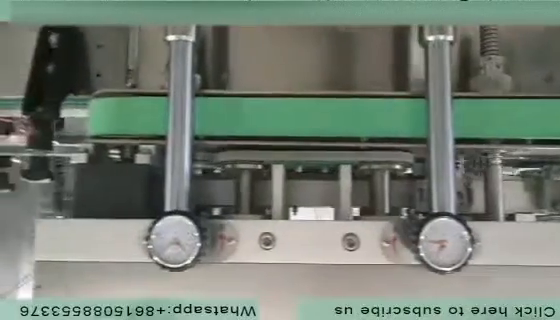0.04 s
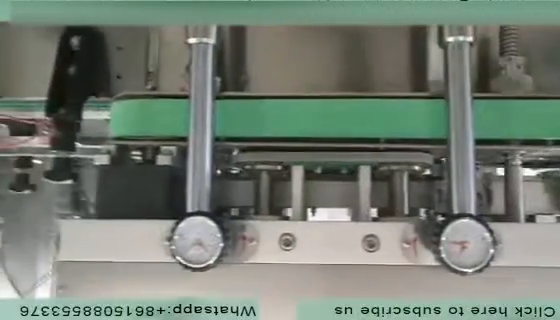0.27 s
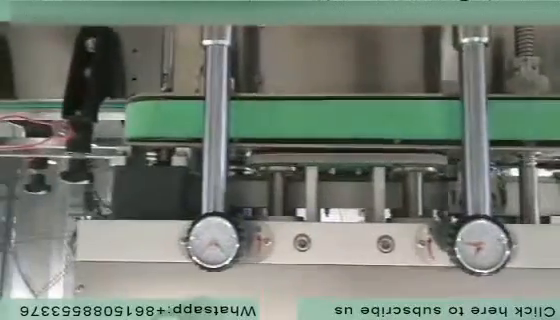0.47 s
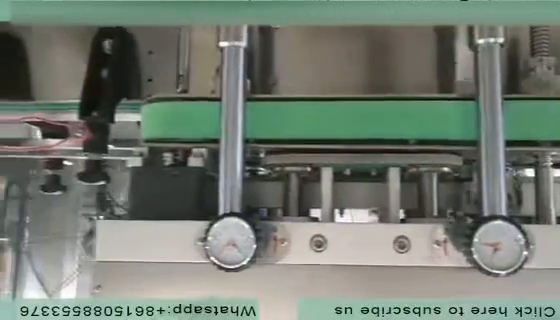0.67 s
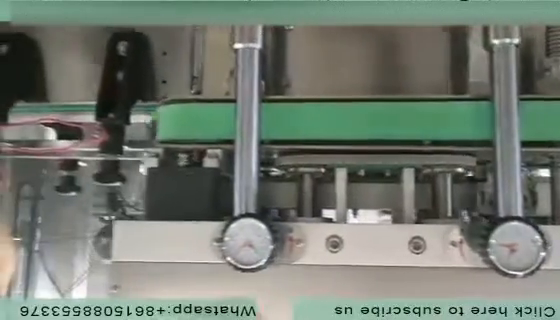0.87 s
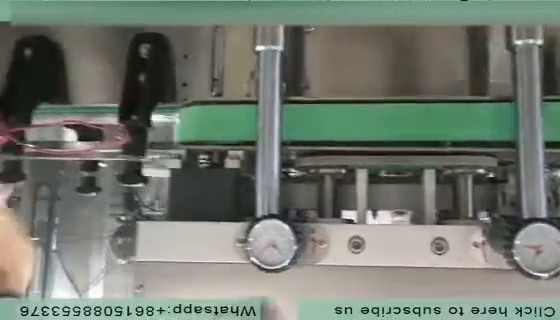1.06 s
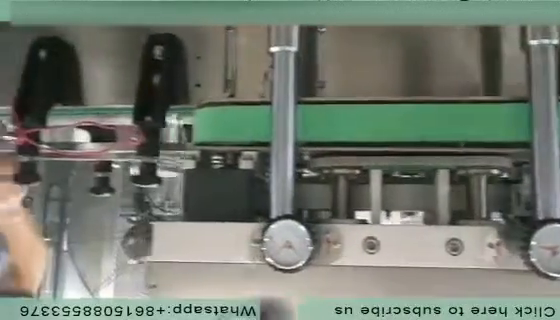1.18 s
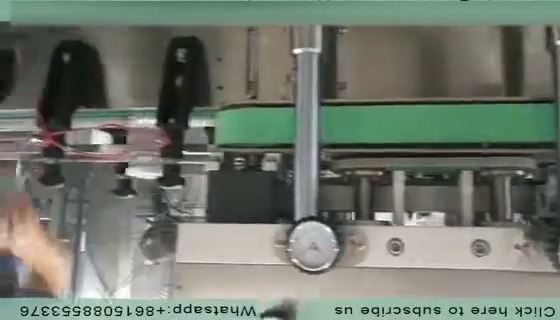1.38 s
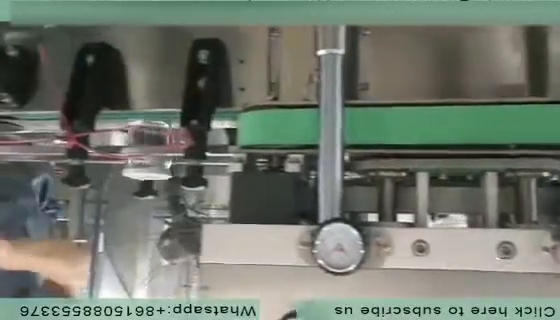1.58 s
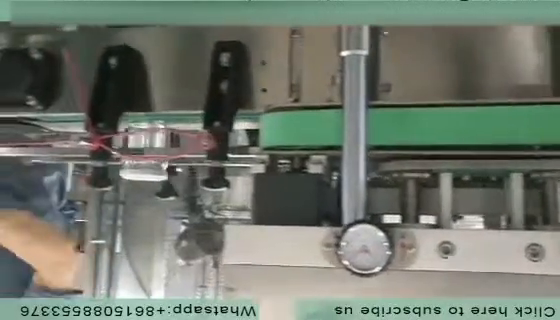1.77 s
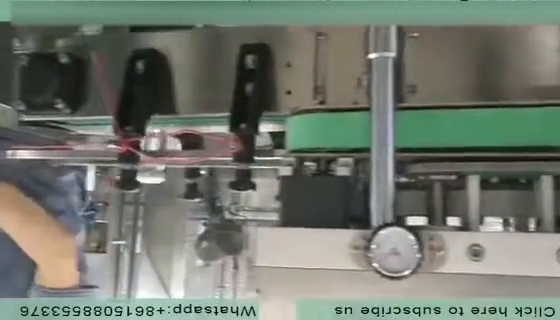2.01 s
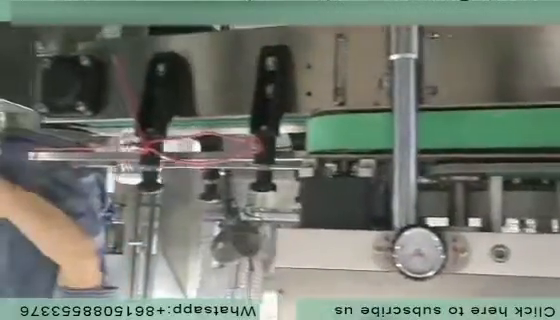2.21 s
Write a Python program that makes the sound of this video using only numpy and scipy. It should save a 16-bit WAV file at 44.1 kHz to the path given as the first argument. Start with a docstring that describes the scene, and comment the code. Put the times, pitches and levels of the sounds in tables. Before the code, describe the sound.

Hard parts clack close by on a bottling line, at about 0.2 and 0.4 seconds, ringing briefly in a factory hall. Small taps follow. Light steel pieces jangle from 1 second, and a heavier fitting clatters brightly at 1.3. Soft thuds boom in the casing around 1.5, then a hollow knock comes at 1.9 with more bumps. A low motor hum and steady air lie underneath.

```python
"""Hard parts clack twice on the guide of a bottle capping line, close to a stereo pair in a factory hall.
A steel fitting clatters, lighter ones jangle, a hollow part knocks: each burst is a run of quick contacts
that ring one body and carry into the hall. Loose parts tap, and soft bumps boom in the casing.
Behind the machine lie a low motor hum and the steady air of the hall."""
import sys
import numpy as np
from scipy import signal
from scipy.fft import rfft, irfft, next_fast_len
from scipy.io import wavfile
from scipy.ndimage import map_coordinates

SR = 44100
rng = np.random.default_rng(int(sys.argv[2]) if len(sys.argv) > 2 else 0)


def to_wav(s):
    """Save 16-bit WAV."""
    ch = np.atleast_2d(s).T  # columns
    pcm = np.round(np.clip(ch, -1, 1) * 32767)  # PCM
    wavfile.write(sys.argv[1], SR, pcm.astype(np.int16))


N = 99225
TIME = np.arange(N) / SR


# Contacts on the guide. Each row: start in seconds, relative level in dB.
CLACK_CONTACTS = [(.2412, -1), (.2454, 2.5), (.2497, -1.5), (.2563, -0.5), (.2638, 1.5), (.2702, -1),
                  (.2775, -6.5), (.2843, -8), (.2966, -8.5), (.3047, -10), (.3124, -10), (.3178, -9.5),
                  (.3826, -10), (.3868, -1.5), (.3943, -6.5), (.4005, -9.5), (.4059, -12), (.4112, -13),
                  (.4177, -4), (.4254, -8), (.4318, -15.5)]
# The slide into each clack. Each row: start and end in seconds, relative final level in dB.
CLACK_SLIDES = [(0.174, 0.246, -35.5), (0.379, 0.4, -25.5)]
# The hard part's ring. Each row: frequency in Hz, relative level in dB, t60 in seconds.
CLACK_RING = [(928, -3, 0.13), (1352, 3, 0.27), (1528, -2, .3), (1563, 0.5, 0.48), (1704, 7.5, 0.12),
              (1905, -7, 0.24), (1976, -0.5, 0.43), (2270, 0, .35), (3155, -5, 0.25), (3654, -5, 0.13)]
# Its tone from close by. Each row: frequency in Hz, gain in dB.
CLACK_TONE = [(100, -30.5), (400, -27), (720, -15), (900, -7.5), (1300, -5), (1600, 2), (2000, 0),
              (2600, -7.5), (4000, -8), (6400, -12.5), (7500, -20), (14000, -27.5)]
# Its place between the microphones. Each row: frequency in Hz, left minus right in dB.
CLACK_BALANCE = [(500, 2), (1100, -5), (1700, -9), (3000, 4), (5500, 4), (10000, 9)]

def clacks():
    """Close to the microphones, a hard part slides up, lands twice and chatters to rest."""
    rub, rise_db = 0, 7.5
    for start, end, db in CLACK_SLIDES:
        remaining = np.clip((end - TIME) / (end - start), 0, 1)
        rub += amp(db - rise_db * remaining) * (TIME > start) * (TIME < end)
    hits = struck(CLACK_CONTACTS, CLACK_RING, crack_db=0.5, dense_db=1, dense_t60=0.13,
                  modes_db=-13, hall_db=0)
    return placed(amp(12) * hits + amp(9) * rub * diffuse(), CLACK_TONE, CLACK_BALANCE, lead_ms=0.24)


# Contacts of the heavy fitting. Each row: start in seconds, relative level in dB.
FITTING_CONTACTS = [(.707, -22.5), (1.309, -2), (1.314, -0.5), (1.318, 6), (1.325, -1), (1.328, 4.5),
                    (1.333, -0.5), (1.338, -26), (1.345, -1.5), (1.366, -2.5)]
# Its ring. Each row: frequency in Hz, relative level in dB, t60 in seconds.
FITTING_RING = [(735, 6.5, 0.12), (777, -9, 0.35), (1050, 1, 0.17), (1459, 7.5, 0.29), (2277, 7.5, 0.31),
                (3280, -11, 0.18), (3150, -1, 0.18), (3300, -7, 0.26), (3750, -3, 0.19), (3992, -1, 0.41),
                (4890, -7, 0.37), (6204, -12, 0.5)]
# Its tone. Each row: frequency in Hz, gain in dB.
FITTING_TONE = [(100, -33), (400, -22.5), (600, -7), (750, -2.5), (1200, -4), (1600, -2.5), (2400, -3.5),
                (3500, -1), (4800, -5), (6400, -8), (7300, -17), (10000, -19.5), (14000, -26.5)]
# Where the steel sits, heavy and light alike. Each row: frequency in Hz, left minus right in dB.
STEEL_BALANCE = [(600, -0.5), (1100, -7.5), (1800, 1), (3000, -1.5), (5500, 6.5), (10000, 6.5), (13500, 18)]

def fitting_clatter():
    """A heavy steel fitting drops in a bright clatter that reaches the left microphone first."""
    hits = struck(FITTING_CONTACTS, FITTING_RING, crack_db=-13, dense_db=2.5, dense_t60=0.13,
                  modes_db=-10.5, hall_db=-0.5)
    return amp(6.5) * placed(hits, FITTING_TONE, STEEL_BALANCE, lead_ms=0.281)


# Contacts of the light steel parts. Each row: start in seconds, relative level in dB.
JANGLE_CONTACTS = [(.157, -11), (.165, -14), (.178, -25), (.998, -4.5), (1.006, -9.5), (1.022, -6),
                   (1.036, 1.5), (1.046, -1), (1.062, -10), (1.087, -1), (1.096, -8), (1.108, -5),
                   (1.205, -8), (1.24, -19), (1.275, -18), (1.447, -1), (1.497, -11)]
# Their ring. Each row: frequency in Hz, relative level in dB, t60 in seconds.
JANGLE_RING = [(2020, -6, 0.098), (2304, 1, .25), (2744, 2.5, 0.16), (2926, -1, .25), (3100, -4.5, .2),
               (3470, 0, 0.23), (3520, 0, 0.11), (3990, 2.5, 0.14), (5600, 8, .13), (6210, 6, 0.2)]
# Their tone. Each row: frequency in Hz, gain in dB.
JANGLE_TONE = [(100, -30), (600, 0), (1200, -12.5), (1700, 4), (2300, 4), (3100, 5.5), (4000, 0.5),
               (4800, 1), (6300, -2), (7300, -8), (9500, -9.5), (14000, -24)]

def jangle():
    """Beside the heavy fitting, light steel parts brush each other and ring."""
    hits = struck(JANGLE_CONTACTS, JANGLE_RING, crack_db=-12, dense_db=5.5, dense_t60=0.35,
                  modes_db=-3.5, hall_db=-4)
    return amp(-6) * placed(hits, JANGLE_TONE, STEEL_BALANCE, lead_ms=0.262)


# Contacts of the hollow part. Each row: start in seconds, relative level in dB.
KNOCK_CONTACTS = [(.003, -9.5), (.835, -8), (.86, -7.5), (1.881, -7.5), (1.887, -0.5), (1.892, -6),
                  (1.897, 7), (1.906, -5), (1.919, -3), (1.929, 2), (1.969, -11)]
# A small panel, here and in the casing. Each row: frequency in Hz, relative level in dB, t60 in seconds.
SMALL_PANEL_RING = [(465.5, -1.5, 0.18), (484.6, -5, 0.12), (527, -8.5, 0.045)]
# The hollow part's tone. Each row: frequency in Hz, gain in dB.
KNOCK_TONE = [(100, -11), (350, -7), (480, 1.5), (640, 0), (850, -5.5), (1300, -4.5), (1700, -3),
              (2400, -4), (3300, -8), (4300, -14), (6500, -15), (9000, -24), (14000, -33)]
# Its place. Each row: frequency in Hz, left minus right in dB.
KNOCK_BALANCE = [(600, -7), (1700, 2.5), (3000, -21), (5500, 5), (10000, 6.5), (13500, 11)]

def knocks():
    """A hollow part is knocked, a little to the right of the microphones."""
    hits = struck(KNOCK_CONTACTS, SMALL_PANEL_RING, crack_db=-3, dense_db=6.5, dense_t60=0.25,
                  modes_db=-22, hall_db=-4)
    return amp(-3) * placed(hits, KNOCK_TONE, KNOCK_BALANCE, lead_ms=-0.26)


# Bumps on the casing. Each row: start in seconds, relative levels of deep and small panel in dB.
CASING_BUMPS = [(.002, -27, -6), (0.044, -19, -7.5), (0.589, -11, -29), (0.789, -3.5, -21),
                (0.829, -5.5, -18), (0.859, -27, -4.5), (1.44, 0, -11.5), (1.45, 3, -14.5), (1.496, 4, -13),
                (1.512, -1.5, -42), (1.568, -5, -16), (1.893, -5, -0.5), (1.917, -18, 7.5),
                (1.931, 6, -9.5), (1.967, -16, 2), (2.005, -12, -2.5), (2.018, 2.5, -11), (2.046, 0, -3),
                (2.085, -26, -17), (2.157, -18, -12), (2.202, -5, -16)]
# Jolts of the frame. Each row: start in seconds, relative level in dB.
FRAME_JOLTS = [(.715, -41.5), (1.38, -40), (1.92, -35), (2.015, -33), (2.11, -40), (2.165, -50)]
# The deep panel and the frame ringing. Each row: frequency in Hz, relative level in dB, t60 in seconds.
DEEP_PANEL_RING = [(182.3, -9, 0.19), (200.5, 2.5, 0.14), (255, -5, .1)]
FRAME_RING = [(96, 0, 0.1), (140.6, 2, 0.227)]

def casing_thuds():
    """Just right of centre, bumps boom in two panels and jolts shake the frame, with little deep bass."""
    bumps = np.array(CASING_BUMPS)
    deep = excite(blows(bumps[:, [0, 1]]), ringing(DEEP_PANEL_RING) * attack(0.0098))
    small = excite(blows(bumps[:, [0, 2]]), ringing(SMALL_PANEL_RING) * attack(0.0014))
    frame = excite(blows(FRAME_JOLTS), ringing(FRAME_RING) * attack(0.015))
    boom = amp(-31) * deep + amp(-32.5) * small + frame
    radiated = filtered(boom, lambda hz: causal(along([(50, -9), (130, -1)], hz)))
    return radiated * amp([[-1.2], [1.2]])


# Loose parts tapping. Each row: start in seconds, relative level in dB, lowest mode in Hz.
LOOSE_TAPS = [(0.13, -32, 1193), (.178, -29.5, 1050), (.229, -25.5, 1262), (.705, -36.5, 1096),
              (.749, -35, 996), (.837, -28, 1283), (.868, -39, 1256)]
# Their ring. Each row: ratio to the lowest mode, relative level in dB.
TAP_RING = [(1, -1), (1.1, -5), (1.83, -4), (2.04, -9), (2.86, -15)]

def taps():
    """Off to the right, each small part rings briefly at its own pitch, blurred by the frame around it."""
    rings, t60 = 0, 0.072
    for start, db, hz in LOOSE_TAPS:
        modes = [(hz * ratio, level, t60) for ratio, level in TAP_RING]
        rings += excite(blows([(start, db)]), ringing(modes) * attack(0.003))
    blur = excite(rings, dense_ring(t60=0.16))
    return (amp(-6.5) * rings + amp(-4) * blur) * amp([[-3], [3]])


# The frame shades the microphones from direct treble. Each row: frequency in Hz, gain in dB.
FRAME_SHADOW = [(2100, 2.5), (3200, -9.5), (8000, -12)]

def struck(rows, modes, crack_db, dense_db, dense_t60, modes_db, hall_db):
    """Each contact gives a crack, a dense ring of the frame, the body's modes and a tail in the hall."""
    scatter_s, spread_db = 0.00025, 4
    contacts = [(start + scatter_s * rng.standard_normal(), db) for start, db in rows]
    force = blows(contacts)
    crack = filtered(force, lambda hz: causal(along(FRAME_SHADOW, hz)))
    frame = excite(force, dense_ring(dense_t60))
    body = 0
    for mode in modes:  # each contact strikes another spot and favours other modes
        uneven = [(start, db + spread_db * rng.standard_normal()) for start, db in contacts]
        body += excite(blows(uneven), ringing([mode]))
    body /= np.linalg.norm(ringing(modes))
    near = amp(crack_db) * crack + amp(dense_db) * frame + amp(modes_db) * body
    return treble_ripple(near + amp(hall_db) * hall_tail(force))


def treble_ripple(x):
    """Random fixed peaks and dips colour the treble, different at each microphone."""
    knots = rng.standard_normal((2, 600))
    depth_db, step_hz = 2.91, 109.4

    def response(hz):
        ripple = np.array([map_coordinates(side, [hz / step_hz]) for side in knots])
        return causal(along([(1500, 0), (3500, depth_db)], hz) * ripple)
    return filtered(x, response)


# Reverberation of the hall. Each row: frequency in Hz, t60 in seconds.
HALL_DECAY = [(200, 0.38), (1600, 0.58), (4000, 0.52), (8000, 0.48), (14000, 0.23)]

def hall_tail(force):
    """The hall answers the energy of the blows with a diffuse tail; each band dies at its own speed."""
    tail, noise = 0, diffuse()
    for centre, t60 in HALL_DECAY:
        decay = amp(-60 * TIME / t60) ** 2 * attack(0.0077)
        energy = np.abs(excite(force ** 2, decay / decay.sum()))
        band = [(hz, hz == centre) for hz, _ in HALL_DECAY]
        tail += filtered(noise, lambda hz: along(band, hz)) * np.sqrt(energy)
    return tail


# Room tone of the hall. Each row: frequency in Hz, relative level in dB.
AIR_TONE = [(15, -11), (25, -52.5), (65, -4), (129, -13), (192, -1.5), (403, -8.5), (539, -5.5),
            (703, -8.5), (802, -9), (966, -8), (1260, -8.5), (2250, -10.5), (3530, -13), (11900, -46.5),
            (14000, -44)]
# Its lean across the pair. Each row: frequency in Hz, left minus right in dB.
AIR_BALANCE = [(100, 1.5), (1500, -3.5), (3500, 3), (9000, 8)]

def hall_air():
    """The steady air of the hall, all around the microphones."""
    air = unit(placed(diffuse(), AIR_TONE, AIR_BALANCE, lead_ms=0))
    return air * amp(-47.5 + 0.74 * wobble(4.7))


# Partials of the motor. Each row: frequency in Hz, rms level in dB.
MOTOR_PARTIALS = [(68, -77.5), (99, -66), (199, -66)]

def motor_hum():
    """A low motor hum wavers in level and phase, the same in both microphones."""
    hum = 0
    for hz, db in MOTOR_PARTIALS:
        peak = np.sqrt(2) * amp(db + 2.7 * wobble(9.3))
        hum += peak * np.sin(2 * np.pi * hz * TIME + 0.2 * wobble(5.75))
    return hum


# How alike the two microphones hear the hall. Each row: frequency in Hz, left-right correlation.
PAIR_LIKENESS = [(30, 0.51), (100, 1), (300, .92), (700, 0.62), (1500, 0.15), (2800, 0.17), (8000, 0.014)]

def diffuse():
    """White noise from all sides, alike at the pair in the bass and unrelated in the treble."""
    def shares(hz):
        angle = np.arccos(along(PAIR_LIKENESS, hz)) / 2
        return np.array([np.cos(angle), np.sin(angle)])
    mid, side = filtered(rng.standard_normal((2, N)), shares)
    return np.array([mid + side, mid - side])


def placed(x, tone, balance, lead_ms):
    """Give a sound its tone, its balance and its head start at the left microphone."""
    side = np.array([[0.5], [-0.5]])

    def response(hz):
        lead = np.exp(2j * np.pi * hz * side * lead_ms / 1000)
        return causal(along(tone, hz) + side * along(balance, hz)) * lead
    return filtered(x, response)


def dense_ring(t60):
    """The frame's dense ring, as a dying burst of noise."""
    return unit(diffuse() * amp(-60 * TIME / t60)) / np.sqrt(N)


def ringing(modes):
    """Damped sines of a struck body, each falling 60 dB in its t60."""
    return sum(amp(db - 60 * TIME / t60) * np.sin(2 * np.pi * hz * TIME) for hz, db, t60 in modes)


def attack(seconds):
    """A rise from 0 towards 1 with this time constant."""
    return 1 - np.exp(-TIME / seconds)


def blows(rows):
    """One impulse for each row of start in seconds and level in dB."""
    starts, db = np.transpose(rows)
    samples = np.clip(np.round(starts * SR).astype(int), 0, N - 1)
    return np.bincount(samples, amp(db), N)


def excite(force, response):
    """Play a force through a response, channel by channel."""
    return signal.fftconvolve(np.atleast_2d(force), np.atleast_2d(response), axes=1)[:, :N]


def filtered(x, response):
    """x through a complex response of frequency."""
    size = 2 * next_fast_len(N)
    return irfft(rfft(x, size) * response(np.fft.rfftfreq(size, 1 / SR)), size)[..., :N]


def causal(db):
    """The minimum-phase response with these levels: nothing sounds before the blow."""
    cepstrum = irfft(np.log(amp(db)))
    half = cepstrum.shape[-1] // 2
    cepstrum[..., 1:half] *= 2
    cepstrum[..., half + 1:] = 0
    return np.exp(rfft(cepstrum))


def wobble(rate):
    """A smooth random curve, rate knots a second."""
    knots = rng.standard_normal(int(N * rate / SR) + 4)
    return map_coordinates(knots, [TIME * rate])


def along(points, hz):
    """Rows of frequency in Hz and value, read on a log axis."""
    freqs, values = np.transpose(points)
    return np.interp(np.log(hz + 1), np.log(freqs + 1), values)


def amp(db):
    """Gain of a level in dB."""
    return 10 ** (np.asarray(db) / 20)


def unit(x):
    """x at rms 1."""
    return x / np.sqrt(np.mean(x ** 2) + 1e-20)


def scene():
    """The line from close by with the hall behind it, at the two microphones."""
    machine = clacks() + jangle() + fitting_clatter() + taps() + knocks() + casing_thuds()
    return machine + hall_air() + motor_hum()


def record(dry):
    """The recorder cuts off steeply at its band limit."""
    top_hz = 14400
    return filtered(dry, lambda hz: 1 / (1 + (hz / top_hz) ** 120))


dry = scene()
out = record(dry)
to_wav(out)
```